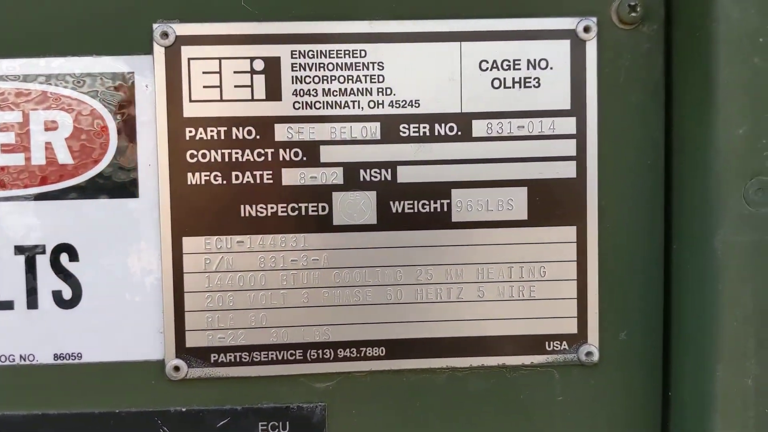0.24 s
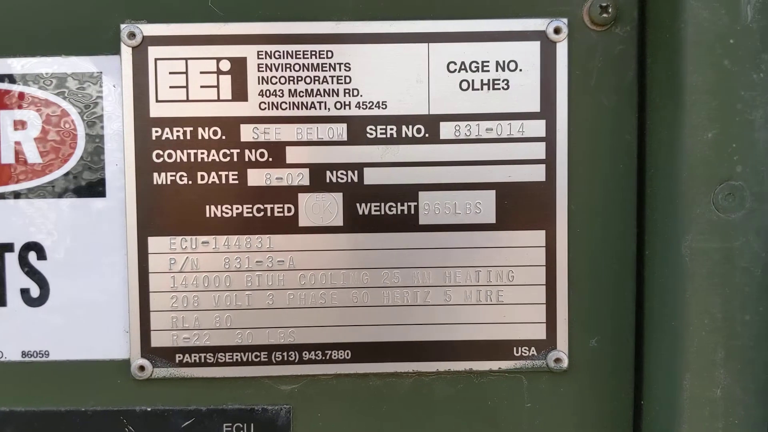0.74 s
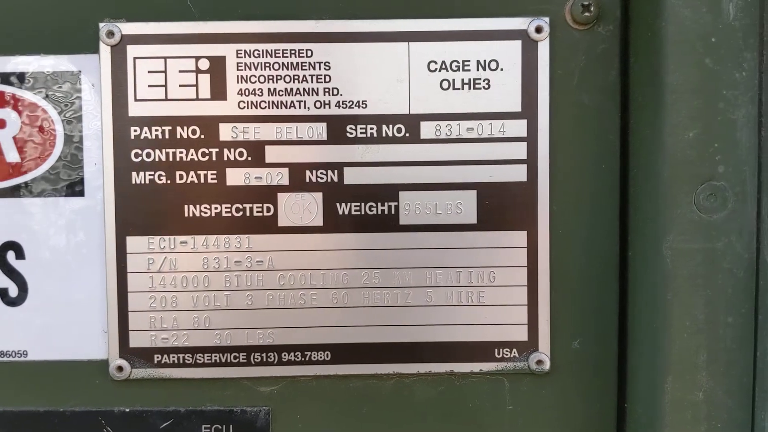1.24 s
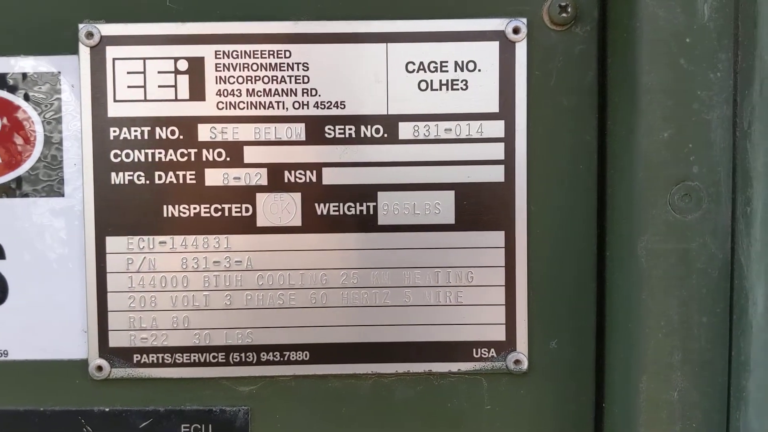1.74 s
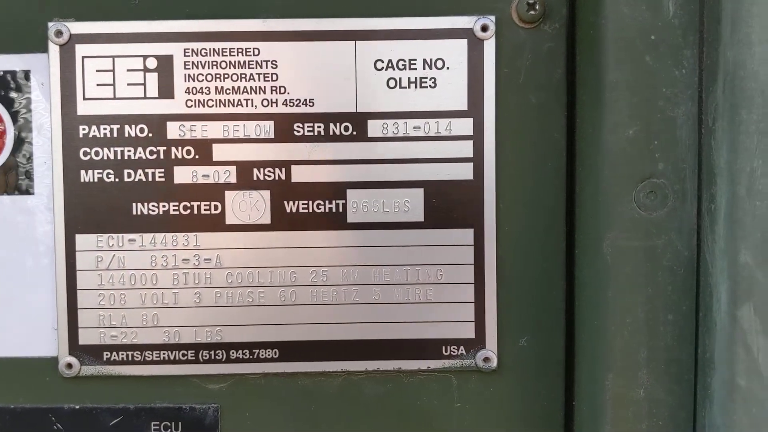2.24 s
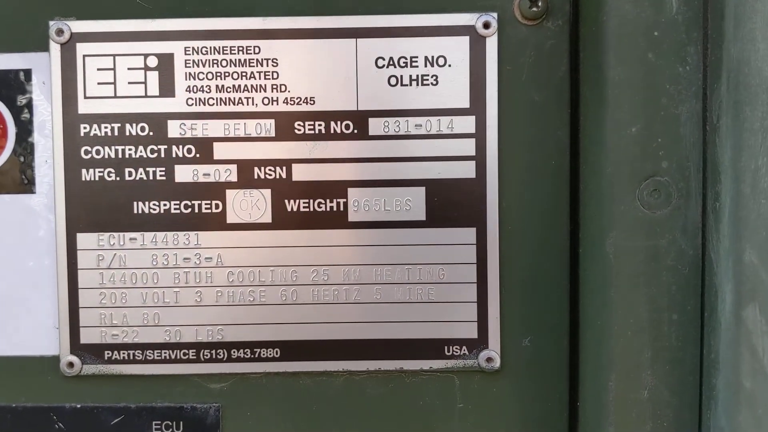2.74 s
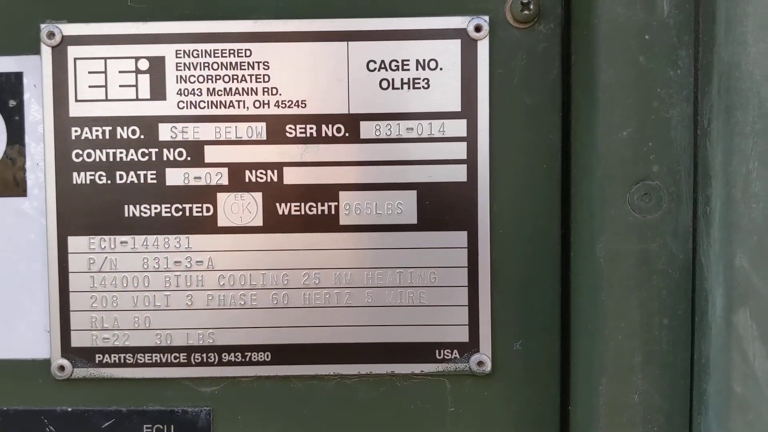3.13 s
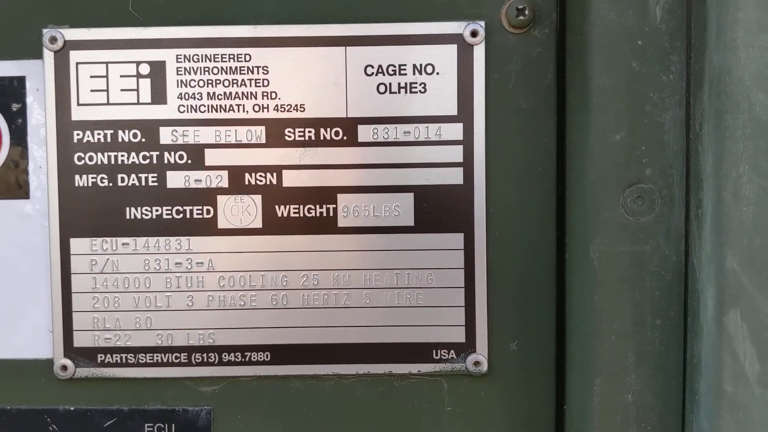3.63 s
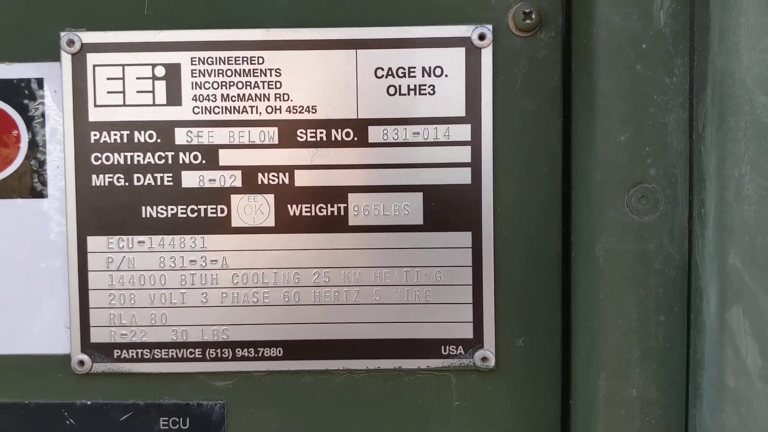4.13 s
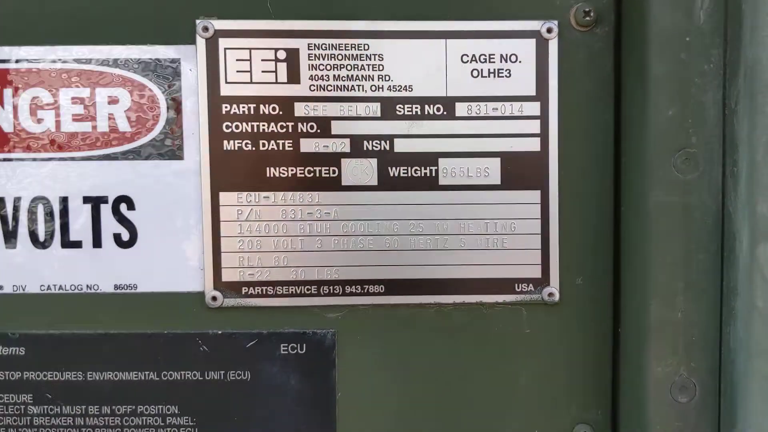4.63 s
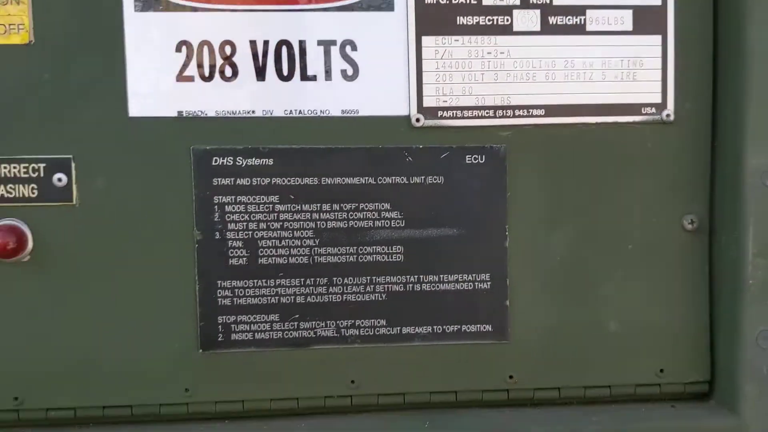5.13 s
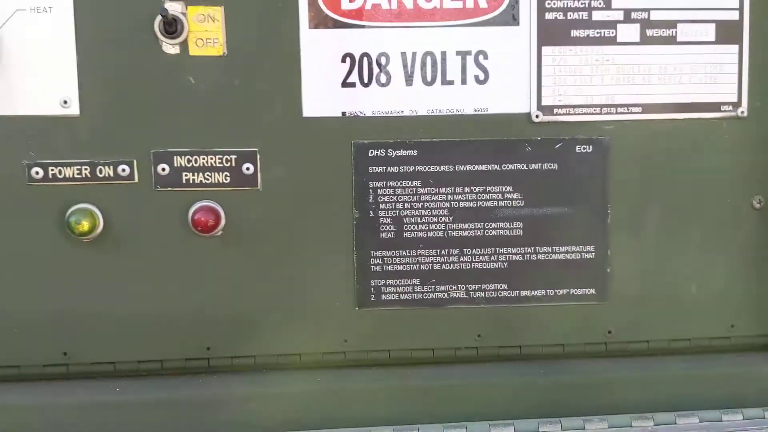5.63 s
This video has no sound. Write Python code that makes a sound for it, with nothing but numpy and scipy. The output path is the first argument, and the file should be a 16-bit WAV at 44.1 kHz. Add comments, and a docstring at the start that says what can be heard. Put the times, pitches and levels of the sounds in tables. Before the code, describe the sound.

Close to a steel machine cabinet, low engine hum and fan rush run constantly under whistling air, electrical whine and scratchy high squeaks.

```python
"""A diesel generator and a big air conditioner run outdoors, heard close to the unit's steel cabinet.
From the start, exhaust tones drone, firings ring the block, and fan noise is filtered by cabinet resonances;
blade tones hum, narrow noise whistles, slot tones whine, and rubbing metal squeaks and scrapes at each turn.
From 0.2 s on, the bearing's steady, ball-modulated note flares and sags in pitch at scattered moments.
From about 4.5 s the microphone moves down the panel, then a little way back, recolouring the air."""
import sys
import numpy as np
from scipy import signal
from scipy.fft import rfft, irfft
from scipy.io import wavfile

SR = 44100
rng = np.random.default_rng(int(sys.argv[2]) if len(sys.argv) > 2 else 0)


def wrap_up_sound(samples):
    """Save the sound to the file named by the first command line argument, as 16-bit audio."""
    columns = np.atleast_2d(samples).T
    # keep every value between -1 and 1, then stretch to whole-number steps
    tamed = np.clip(columns, -1, 1)
    steps = np.round(tamed * 32767).astype(np.int16)
    wavfile.write(sys.argv[1], SR, steps)


N = 258867
T = np.arange(N) / SR
HZ = np.fft.rfftfreq(N, 1 / SR)
SIDES = np.array([[0.5], [-0.5]])  # half of any left-right difference goes to each port


def amp(db):
    """Logarithmic level: decibels become an amplitude ratio."""
    return 10 ** (np.asarray(db) / 20)


def unit(x):
    """Normalisation: scales a signal to rms 1."""
    return x / np.sqrt(np.mean(x ** 2) + 1e-20)


def over_time(rows):
    """Linear interpolation: each column of a curve, read at every sample."""
    seconds, *columns = np.transpose(rows)
    return [np.interp(T, seconds, column) for column in columns]


def over_pitch(rows, hz):
    """Logarithmic pitch: each column of a spectrum, interpolated on a log-frequency axis."""
    table_hz, *columns = np.transpose(rows)
    return [np.interp(np.log(hz + 1), np.log(table_hz + 1), column) for column in columns]


def drift(rate_hz):
    """Low-passed random fluctuation: zero mean, rms 1, with a Gaussian roll-off set by the rate."""
    coarse = np.linspace(0, T[-1], 2 ** 14)
    hz = np.fft.rfftfreq(len(coarse), coarse[1])
    rolloff = np.exp(-(hz / rate_hz) ** 2) * (hz > 0)
    slow = irfft(rfft(rng.standard_normal(len(coarse))) * rolloff)
    return np.interp(T, coarse, unit(slow))


def pan(balance_db):
    """Interaural level difference: left and right gains for left minus right dB."""
    return amp(SIDES * balance_db)


def tone(turns, balance_db, lead_rad):
    """Interaural phase: a sine of rms 1 before panning, with the left port leading."""
    return np.sqrt(2) * pan(balance_db) * np.cos(2 * np.pi * turns + SIDES * lead_rad)


def ring(x, modes):
    """Modal resonance: x excites a set of steep resonances; the result has rms 1."""
    power = 0
    for hz, width_hz, db in modes:
        power = power + amp(db) ** 2 / (1 + ((HZ - hz) / width_hz) ** 2) ** 3
    return unit(irfft(rfft(x) * np.sqrt(power), N))


def throb(turns, sharpness):
    """Periodic excitation: one smooth burst a cycle, peaking at whole turns."""
    return np.exp(sharpness * (np.cos(2 * np.pi * turns) - 1))


# Sound field at the two microphone ports:
# pitch_hz [Hz], likeness [0-1], left_lead_rad [rad], left_minus_right_db [dB]
PORT_FIELD = [(60, 0.86, -0.28, 4), (130, 1, -0.55, 2), (252, 0.86, -0.92, 3), (388, 0.98, -1.36, 4),
              (594, 0.42, -1.13, 3), (750, 0.74, 0.082, 6), (1160, 0.84, 0.72, 2.5),
              (1570, 0.03, 0.87, 1.5), (2360, 0.11, 0.031, -2.5), (3180, 0, 0.53, 4),
              (4100, 0.05, -0.051, 4.5), (5600, 0, 0.36, 2.5), (10100, 0, -0.23, 6.5),
              (13000, 0.07, 0, -1.5), (15500, 0, 0, 3.5)]


def partly_alike(first, second, likeness, lead_rad):
    """Coherence: a left and right pair sharing the first source to the given likeness."""
    likeness = np.clip(likeness, 0, 1)
    right = likeness * first + np.sqrt(1 - likeness ** 2) * second
    return np.array([first, right * np.exp(-1j * lead_rad)])


def port_noise():
    """Frequency-dependent coherence: stereo noise spectra, alike in the bass, unrelated in the treble."""
    likeness, lead_rad, balance_db = over_pitch(PORT_FIELD, HZ)
    first, second = rfft(rng.standard_normal((2, N)))
    return pan(balance_db) * partly_alike(first, second, likeness, lead_rad)


SHAFT_HZ = 29.935  # mean engine speed


def governed_shaft():
    """Speed governing: turns of the engine shaft, whose speed departs only slightly from its mean."""
    return np.cumsum(SHAFT_HZ + 0.025 * drift(2)) / SR


# Microphone path along the panel: time_s [s], place [0 = high, 1 = low]
MICROPHONE_PATH = [(0, 0.041), (4.55, 0.12), (4.8, .5), (5.05, 0.62), (5.3, 0.99), (5.87, 0.8)]


def microphone_place():
    """Receiver position: the microphone's height on the panel over time."""
    return np.clip(over_time(MICROPHONE_PATH)[0], 0, 1)


# Exhaust orders of four cylinders, two firings a turn, before shading:
# order [multiple of shaft speed], level_db [dB], left_minus_right_db [dB]
EXHAUST_ORDERS = [(1.0, -45.0, 2), (2.0, -21.6, 1), (2.5, -46.1, 2), (4.0, -25.1, 2), (5.0, -40.9, 2),
                  (5.5, -44.2, 2), (6.0, -34.2, 3), (6.5, -47.0, 3), (7.0, -43.3, 5), (7.5, -48.9, 5),
                  (8.0, -45.1, 5), (8.5, -46.0, 6), (10.0, -41.1, 7), (11.0, -52.4, 5), (12.0, -43.4, 12),
                  (13.0, -42.7, 6), (13.5, -50.1, 7), (14.0, -45.6, 9), (14.5, -45.3, 9), (16.0, -47.4, -3),
                  (16.5, -50.7, 4), (18.0, -49.6, 13), (20.5, -53.4, 10), (23.0, -53.5, 12),
                  (24.0, -48.7, 9), (27.5, -51.5, 4), (28.0, -47.5, 7), (28.5, -52.6, 5)]


def drone(shaft, place, waver=0.023, waver_hz=7, locked_order=12, muffler_lag_turns=0.005, shade_db=-5):
    """Harmonic orders: low ones lock to the firing, high ones scatter and waver with uneven combustion."""
    out = np.zeros((2, N))
    unrest = [drift(waver_hz) for _ in range(6)]
    for k, (order, db, balance_db) in enumerate(EXHAUST_ORDERS):
        loose = min(1, (order / locked_order) ** 4)
        # the muffler holds high orders back and so smears each pulse
        lag = muffler_lag_turns * order ** 3
        depth = waver * np.sqrt(order)
        scatter = loose * rng.uniform(-0.43, 0.46)
        turns = order * shaft - lag + scatter + depth * unrest[k % len(unrest)] / (2 * np.pi)
        swell = 1 + depth * unrest[(k + 2) % len(unrest)]
        lead_rad = over_pitch(PORT_FIELD, order * SHAFT_HZ)[1]
        # the cabinet shades chiefly the short waves as the microphone goes down
        gain = amp(db + shade_db * loose * place)
        out += gain * swell * tone(turns, balance_db, lead_rad)
    return out


# Resonances of the engine block, relative to each other:
# pitch_hz [Hz], width_hz [Hz from centre to one eighth power], level_db [dB]
BLOCK_RESONANCES = [(785, 47, 1), (846, 124, -1.5), (1125, 54, -2.5), (1460, 270, -14)]


def knock(shaft, place, level_db=-35.0, sharpness=2.2, delay_turns=0.28, shade_db=-7):
    """Impulsive excitation: firings of uneven force rattle the block; lower down the cabinet shades it."""
    force = amp(1.5 * drift(14))
    blows = irfft(port_noise(), N) * throb(2 * shaft - delay_turns, sharpness) * force
    return amp(level_db + shade_db * place) * ring(blows, BLOCK_RESONANCES)


# Fan turbulence, relative spectrum: pitch_hz [Hz], density_db [dB per Hz]
FAN_SPECTRUM = [(5, -18), (20, 0), (40, -5), (75, 3.5), (190, 3), (300, -5), (600, -7), (1000, -8),
                (1300, -15), (2500, -12.5), (4600, -18.5), (6700, -22.5), (10800, -21.5), (12800, -32),
                (15600, -24.5)]
# Cabinet resonances: pitch_hz [Hz], width_hz [Hz, between points of half the dB lift],
# lift_high_db [dB], lift_halfway_db [dB], lift_low_db [dB]
CABINET_RESONANCES = [(400, 49, 0.5, 3, 13.5), (467, 70, 4.5, 2, 6.5), (680, 130, 0.5, 5.5, 0),
                      (800, 160, 1.5, 0.5, -2), (944, 96, -2, -5, 7.5), (1497, 340, 2.5, 7.5, 2),
                      (1945, 76, -3, -7, -2), (2024, 72, 2.5, 4, 3.5), (3150, 350, 3, 1.5, 2.5),
                      (4050, 300, 6, 6, -1), (5610, 980, 5, 5, 5), (7960, 1050, 11, 10.5, 13),
                      (11500, 610, 3, 4, 1)]


def air(place, level_db=-26.5, gust_db=0.5, gust_hz=9):
    """Broadband turbulence: fan noise, coloured by cabinet resonances according to microphone height."""
    rush = port_noise() * amp(over_pitch(FAN_SPECTRUM, HZ)[0])
    rush /= np.std(irfft(rush, N))
    lifts_db = 0
    for hz, width_hz, *lift_db in CABINET_RESONANCES:
        bell = 2 ** -(2 * (HZ - hz) / width_hz) ** 2
        lifts_db = lifts_db + np.outer(lift_db, bell)
    blend = 0
    for k, lift_db in enumerate(lifts_db):  # crossfade high, halfway, low
        share = np.maximum(0, 1 - abs(2 * place - k))
        blend = blend + share * irfft(rush * amp(lift_db), N)
    return amp(level_db + gust_db * drift(gust_hz)) * blend


# Fan blade tones: pitch_hz [Hz], level_db [dB]
BLADE_TONES = [(76, -47), (87, -48), (96, -43)]


def blades(sway_turns=0.076):
    """Blade passing: the fans hum at their own slightly unsteady speeds."""
    out = np.zeros((2, N))
    for hz, db in BLADE_TONES:
        _, lead_rad, balance_db = over_pitch(PORT_FIELD, hz)
        out += amp(db) * tone(hz * T + sway_turns * drift(3.2), balance_db, lead_rad)
    return out


# Air hooting and whistling in ducts and grille, before swelling and shading:
# pitch_hz [Hz], width_hz [Hz, rate of the noise modulation], level_db [dB], left_minus_right_db [dB]
DUCT_WHISTLES = [(821.4, 19, -40, 4), (2504, 49, -47, 3.5), (3152, 140, -46, 9.5), (4062, 65, -44, 7.5)]


def whistles(place, wander_hz=24, wander_rate_hz=14, swell_db=1.6, shade_db=-9):
    """Jet tones: narrow noise bands wander in pitch and strength with the draught."""
    out = np.zeros((2, N))
    for hz, width_hz, db, balance_db in DUCT_WHISTLES:
        likeness, lead_rad, _ = over_pitch(PORT_FIELD, hz)
        first, second = (drift(width_hz) + 1j * drift(width_hz) for _ in range(2))
        fuzz = partly_alike(first, second, likeness, lead_rad)
        fuzz /= np.sqrt(1 + abs(fuzz) ** 2)  # the jet saturates, which steadies the note
        turns = np.cumsum(hz + wander_hz * drift(wander_rate_hz)) / SR
        whistle = unit((fuzz * np.exp(2j * np.pi * turns)).real)
        out += amp(db + swell_db * drift(wander_rate_hz)) * pan(balance_db) * whistle
    return amp(shade_db * place) * out


# Motor slot tones, in steps of twice the mains frequency, before fading and the overall level:
# multiple [multiple of mains frequency], level_db [dB], left_minus_right_db [dB]
SLOT_TONES = [(76, -57.6, 9.6), (78, -57.8, 7.2), (80, -60.3, 3.2), (82, -57.3, 7.5), (84, -58.5, 1.2),
              (86, -54.3, 4.1), (88, -54.5, 7.2), (90, -52.0, 11.8), (92, -49.2, 2.2), (94, -54.0, -0.2),
              (96, -54.1, 0.7)]


def whine(shaft, place, level_db=-1.0, shade_db=-5, fade_db=2.0, fade_hz=2,
          scatter_turns=0.1, port_wander_rad=0.71):
    """Magnetic slot tones: nearly in step, they buzz at twice the mains; standing waves fade each one."""
    out = np.zeros((2, N))
    for multiple, db, balance_db in SLOT_TONES:
        turns = multiple * 2 * shaft + scatter_turns * drift(fade_hz)
        gain = amp(db + fade_db * drift(fade_hz))
        out += gain * tone(turns, balance_db, port_wander_rad * drift(fade_hz))
    return amp(level_db + shade_db * place) * out


# The bearing's mean note between flares, and what every flare shares
SQUEAL_HZ, SQUEAL_DB = 8180, -37
FLARE_BOOST_DB, FLARE_EDGE_S, SAG_HZ_PER_S = 2, 0.023, 160
# Passing balls: rate, depth of their shake (share of amplitude) and of their bend (turns of phase)
BALL_HZ, BALL_SHAKE, BALL_BEND_TURNS = 171, 0.26, 0.02
# Flares when the bearing grips: start_s [s], length_s [s], level_db [dB before the shared boost],
# pitch_hz [Hz at mid-flare], left_minus_right_db [dB]
BEARING_FLARES = [(0.204, 0.11, -32, 8170, 1.5), (0.476, 0.027, -34, 8207, 4),
                  (0.537, 0.06, -34, 8170, -2.5), (0.655, 0.034, -34, 8190, 0.5),
                  (1.478, 0.22, -32, 8184, 1), (1.782, 0.041, -34, 8189, 1.0),
                  (1.876, 0.24, -30, 8210, 7.5), (2.813, 0.066, -33, 8195, -2), (3.605, 0.3, -33, 8200, 10),
                  (3.919, 0.046, -33, 8150, 10), (4.018, 0.038, -32, 8200, 13),
                  (4.172, 0.089, -31, 8190, 5.0), (4.372, 0.095, -34.5, 8240, 13),
                  (4.56, 0.086, -31.5, 8184, 0.5), (4.703, 0.067, -32, 8270, 8.0),
                  (4.851, 0.071, -32, 8220, -3.0), (4.955, 0.21, -30, 8173, -1),
                  (5.5, 0.04, -34.5, 8183, 18), (5.667, 0.029, -34, 8200, -1.5),
                  (5.729, 0.16, -34, 8221, 6.5)]


def squeal(wander_hz=11, jitter_hz=9, fade_db=2, flutter_db=1.86, sway_db=6, port_wander_rad=1.34):
    """Stick-slip friction: a dry bearing sings and flares on gripping; balls modulate level and pitch."""
    gain = amp(SQUEAL_DB + fade_db * drift(13))
    hz = SQUEAL_HZ + wander_hz * drift(5.28)
    balance_db = sway_db * drift(6.6)
    for start_s, length_s, db, flare_hz, flare_balance_db in BEARING_FLARES:
        since_middle = T - start_s - length_s / 2
        # the grip swells, holds and dies away while the pitch sags
        grip = np.clip((length_s / 2 - abs(since_middle)) / FLARE_EDGE_S + 0.5, 0, 1)
        sagging_hz = flare_hz - SAG_HZ_PER_S * since_middle
        gain = gain + grip * (amp(FLARE_BOOST_DB + db) - gain)
        hz = hz + grip * (sagging_hz - hz)
        balance_db = balance_db + grip * (flare_balance_db - balance_db)
    ball_phase = 2 * np.pi * np.cumsum(BALL_HZ + 5 * drift(20)) / SR
    turns = np.cumsum(hz + jitter_hz * drift(65)) / SR - BALL_BEND_TURNS * np.sin(ball_phase)
    shake = amp(flutter_db * drift(54)) * (1 + BALL_SHAKE * np.cos(ball_phase))
    return gain * shake * tone(turns, balance_db, port_wander_rad * drift(1.9))


# Level of the rubbing metal, common to squeak and scrape: time_s [s], level_db [dB]
RUB_LEVEL = [(0.0, -38), (0.85, -33), (1.03, -38), (2.76, -38), (2.99, -34.5), (3.27, -43), (3.4, -36.5),
             (3.96, -44), (4.97, -36), (4.98, -44), (5.8, -36), (5.87, -39)]
# Resonances of the rubbed metal, relative to each other:
# pitch_hz [Hz], width_hz [Hz from centre to one eighth power], level_db [dB]
RUB_RESONANCES = [(9280, 170, -8.5), (9710, 200, -2.5), (10030, 140, -0.5), (10370, 190, -11)]


def chirp(shaft, squeak_hz=9830, wander_hz=50, fall_hz=110, squeak_db=0.5, sharpness=1.86, contact=0.22,
          delay_turns=0.39, uneven_db=1.5, swell_db=0.9, balance_db=2.5):
    """Periodic rubbing: each turn of a mains-speed motor gives a falling squeak over a dry scrape."""
    turn = 2 * shaft - delay_turns
    unevenness = amp(uneven_db * drift(47) + swell_db * drift(11))
    pressure = unit((contact + throb(turn, sharpness)) * unevenness)
    # the pitch falls through each pressure peak
    hz = squeak_hz - fall_hz * np.sin(2 * np.pi * turn) + wander_hz * drift(126)
    squeak = pressure * tone(np.cumsum(hz) / SR, balance_db, 1.4 * drift(32))
    scrape = ring(irfft(port_noise(), N) * pressure, RUB_RESONANCES)
    return amp(over_time(RUB_LEVEL)[0]) * (amp(squeak_db) * squeak + scrape)


def scene():
    """Superposition: the governed shaft paces engine and mains-fed motor; fans, air and bearing run free."""
    shaft = governed_shaft()
    place = microphone_place()
    generator = drone(shaft, place) + knock(shaft, place)
    moving_air = air(place) + blades() + whistles(place)
    machinery = whine(shaft, place) + squeal() + chirp(shaft)
    return generator + moving_air + machinery


EDGE_HZ = 15800  # upper band limit


def record(dry):
    """Band limiting: the recorder's linear-phase low-pass filter."""
    lowpass = signal.firwin(801, EDGE_HZ, window=("kaiser", 9), fs=SR)
    return signal.oaconvolve(dry, lowpass[None], "same")


dry = scene()
out = record(dry)
wrap_up_sound(out)
```